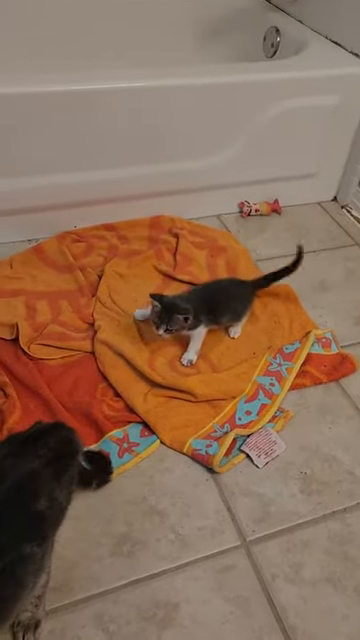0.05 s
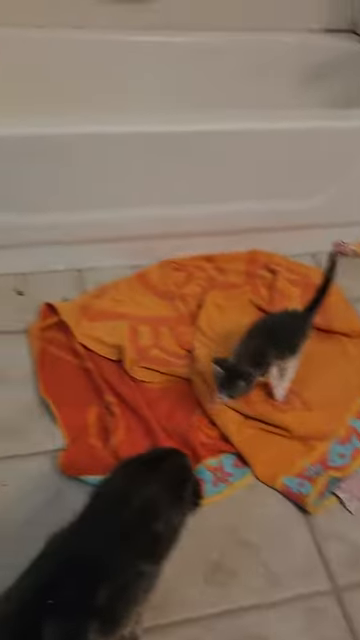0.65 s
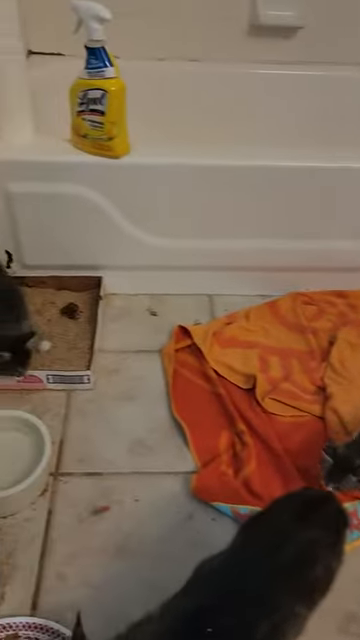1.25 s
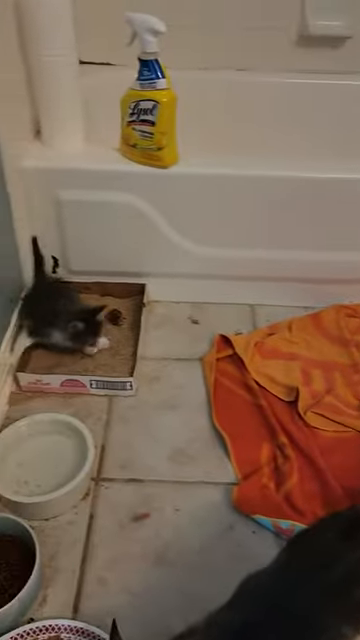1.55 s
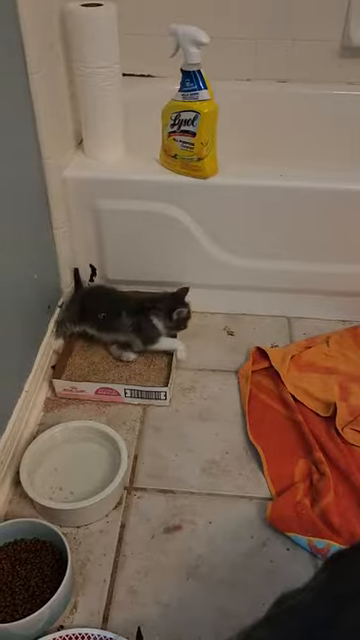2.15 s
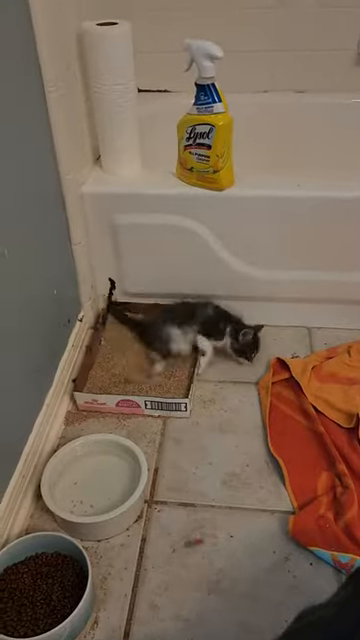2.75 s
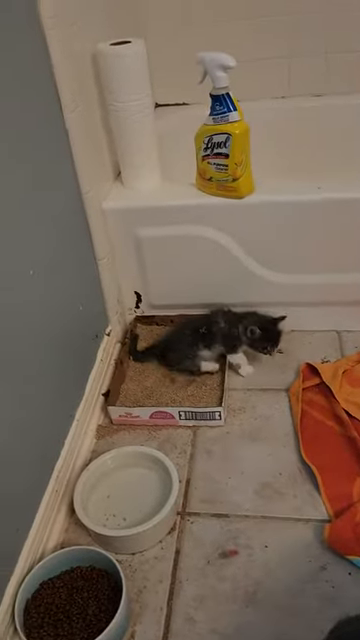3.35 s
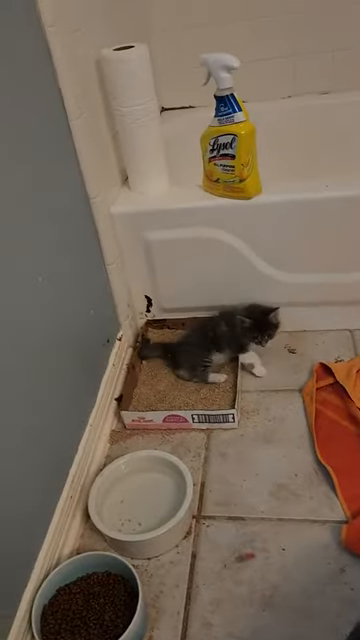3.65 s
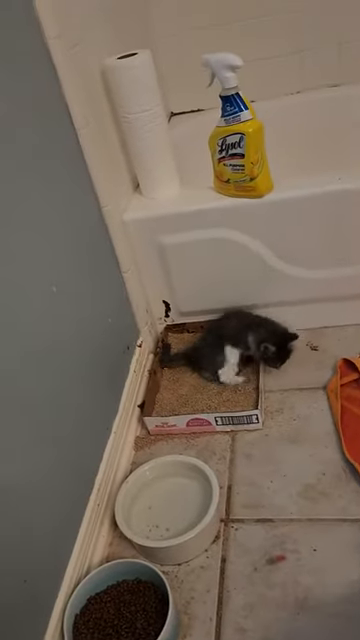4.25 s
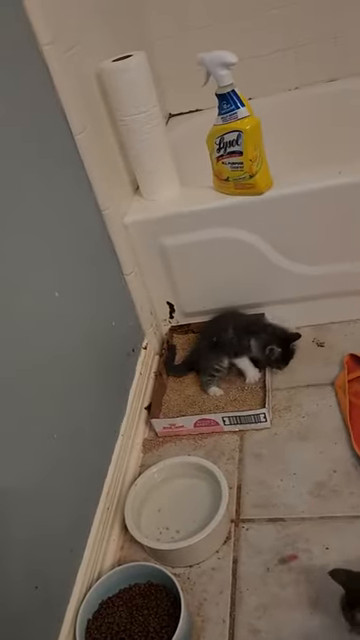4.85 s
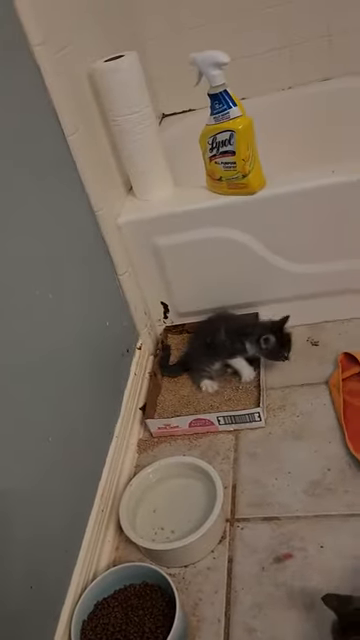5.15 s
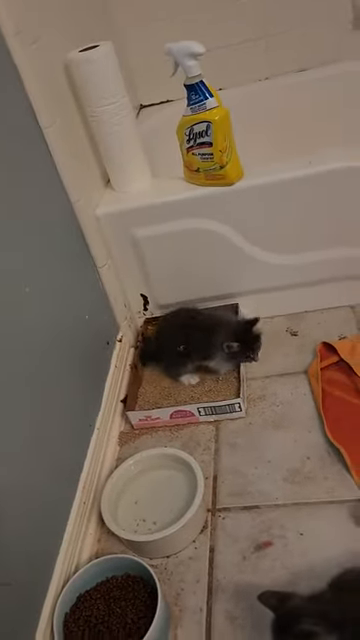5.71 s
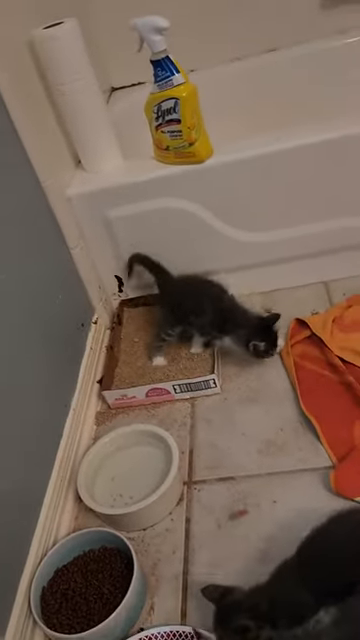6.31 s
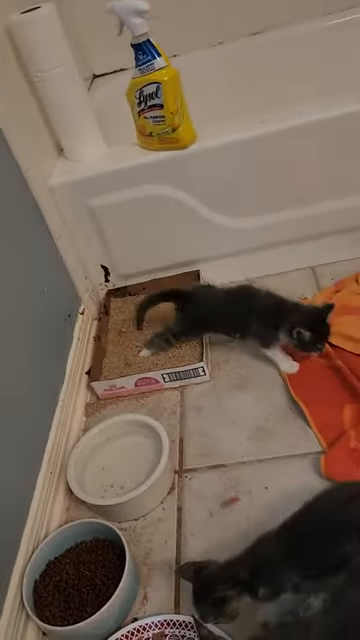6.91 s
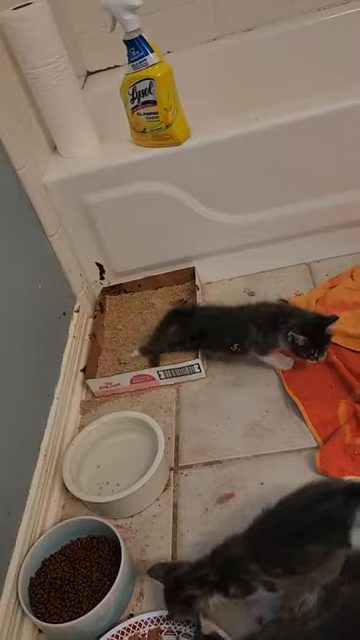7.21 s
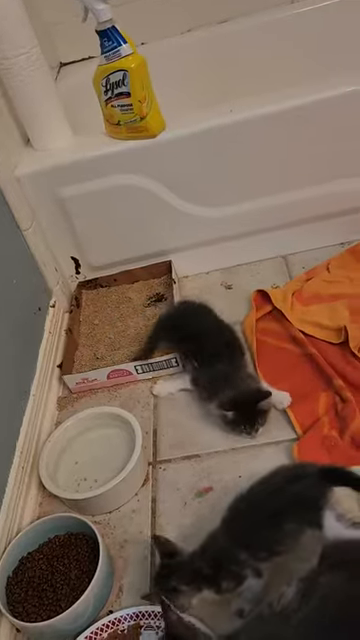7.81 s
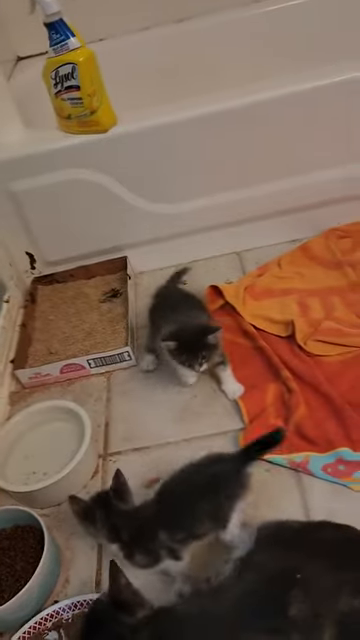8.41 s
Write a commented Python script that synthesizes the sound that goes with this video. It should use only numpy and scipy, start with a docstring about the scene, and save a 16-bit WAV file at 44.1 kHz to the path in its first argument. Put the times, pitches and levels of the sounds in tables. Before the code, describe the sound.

In a small tiled bathroom, kitten paws scrape cardboard, land softly and click on the floor before a brief, high, falling mew.

```python
"""Kittens play in a small tiled bathroom, over a faint bed of hum and hiss; the hard walls add a short,
bright ring. Paws scuff a corrugated cardboard tray in stick-slip strokes while claws and grit tick on
the tiles. Near 2 s a kitten lands with a thump, and soon the tray judders under a step on its rim.
At 5.5 s a hard pull tears at the dry fibres, followed by more scuffs and padded landings.
Around 8 s a kitten gives one thin, falling mew that brightens as its mouth opens."""
import sys
import numpy as np
from scipy import signal
from scipy.fft import rfft, irfft, next_fast_len
from scipy.io import wavfile

SR = 44100
rng = np.random.default_rng(int(sys.argv[2]) if len(sys.argv) > 2 else 0)


def digitize_waveform(pressure):
    """Quantize a signal to 16-bit integers and store it at the path in sys.argv[1].

    Rows of a 2-D input are taken as channels; values are limited to [-1, 1].
    """
    field = np.atleast_2d(pressure).T
    bounded = np.clip(field, -1, 1)
    quanta = np.round(bounded * 32767).astype(np.int16)
    wavfile.write(sys.argv[1], SR, quanta)


N = 377921
TIME = np.arange(N) / SR

# paws dragged over cardboard and cloth: peak t/s, level/dB, rise/s, fall/s, ring f/Hz, ring boost/dB
PAW_STROKES = [(.262, -46.5, 0.039, .11, 1250, 5.5), (.69, -65.5, .2, 0.48, 4000, 5.5),
               (1.348, -54, 0.0095, .011, 5330, 8), (1.508, -48.5, 0.024, 0.06, 1160, 14),
               (1.615, -57.5, .037, 0.018, 13000, 7), (1.845, -50.5, 0.017, 0.033, 870, 15.5),
               (1.93, -41.5, 0.025, 0.0091, 4200, 13.5), (1.965, -52, 0.038, 0.019, 5000, -6),
               (2.49, -57.5, 0.054, .13, 12500, 2.5), (2.70, -46, 0.061, 0.088, 3380, 7),
               (2.785, -40, 0.031, .071, 1940, 4), (2.91, -55, 0.04, 0.077, 1760, 6),
               (3.033, -47, 0.014, 0.013, 2310, 6.5), (3.508, -44, .044, 0.034, 2440, 3.5),
               (4.04, -65, 0.054, 0.045, 1250, 12), (4.281, -62, 0.037, 0.044, 12500, 3),
               (4.476, -50.5, 0.016, 0.028, 604, 9.5), (4.625, -54, 0.063, 0.042, 840, 8.5),
               (5.37, -62, .04, .026, 750, 18), (5.412, -50.5, .022, 0.031, 4000, 8),
               (5.5002, -26, 0.0037, 0.0035, 4300, 8.5), (5.509, -34.5, 0.0028, 0.0091, 2130, 9),
               (5.511, -30, .004, 0.013, 5500, 9), (5.915, -45.5, 0.057, 0.045, 3160, 10),
               (5.996, -42.5, .025, 0.031, 3250, 14), (6.135, -53.5, 0.028, 0.035, 3240, 9),
               (6.307, -52.5, 0.039, 0.075, 1430, 14.5), (6.358, -43, 0.0069, 0.039, 1250, 5),
               (6.53, -52, 0.052, .04, 4300, 6), (6.69, -54.5, 0.016, 0.065, 4040, -3),
               (6.855, -56.5, 0.064, 0.11, 1300, 6.5), (7.085, -62, 0.012, 0.15, 5500, 5),
               (7.497, -54.5, 0.017, 0.12, 3700, 7.5), (7.63, -56.5, 0.023, 0.068, 3600, 4.5),
               (7.86, -61, 0.085, .15, 6100, 12), (8.19, -64, 0.017, 0.14, 2000, -9)]
# tone colour of every scrape and tick: f/Hz, level/dB
FRICTION_EQ = [(120, -31), (250, -15), (400, -8), (650, -3), (1100, -1), (2200, 0.5), (3300, -2),
               (5500, -1.5), (7300, -1.5), (8500, -6), (12000, -7), (16000, -12.5)]
# claws and grit on tile, knocks on the tray: t/s, peak level/dB, ring f/Hz, ring boost/dB
CLAW_TAPS = [(0.5616, -39, 1050, 4), (.656, -32, 4900, 7), (1.0986, -44.5, 980, 19),
             (1.1894, -43.5, 4850, 6), (1.347, -47.5, 960, 26), (1.4302, -43, 2940, 14),
             (1.494, -41, 1420, 19), (1.799, -43, 784, 10), (1.84, -36, 1460, 23), (1.979, -33, 5040, 10),
             (2.1081, -32.5, 5330, 18), (2.3726, -24.5, 1480, 8), (2.38, -33.5, 930, 19),
             (2.5977, -38.5, 4640, 12), (3.304, -37, 2350, 5), (3.849, -46, 3100, 23),
             (4.341, -42.5, 3670, 5), (4.4682, -45, 3500, -3), (5.4565, -35, 4000, 22),
             (6.3567, -37, 3020, 30), (6.6707, -31.5, 4920, 10), (7.0747, -40, 4530, 3.5),
             (7.301, -44.5, 6500, 31), (7.491, -39.5, 3960, 1)]
# soft weight landing on tray and floor: t/s, level/dB, f/Hz
LANDINGS = [(.560, -45, 340), (1.10, -50, 360), (1.19, -55, 111), (1.811, -23, 131), (1.834, -27.5, 79.4),
            (2.374, -35, 643), (2.659, -42.5, 112), (2.75, -43, 113), (3.852, -54, 100),
            (4.228, -43.5, 126.4), (4.405, -44.5, 106), (4.713, -52, 131), (5.973, -31.5, 216),
            (5.985, -44, 101), (6.916, -40.5, 150), (6.967, -49, 107), (7.145, -45, 164), (7.495, -27, 207),
            (7.608, -26, 194), (7.624, -32.5, 308)]
# the tray judders as a kitten treads on its rim: t/s, level/dB
RIM_STEPS = [(2.728, -40), (2.752, -34.5), (2.825, -43), (5.973, -35.5)]
# tone colour of shaking cardboard: f/Hz, level/dB
FLUTTER_EQ = [(40, -32), (80, 0), (170, -2), (330, -1), (480, -11.5), (800, -17.5), (2000, -61),
              (6000, -70)]
# low resonances of tray, floor and tub: f/Hz, width/Hz, level/dB
LOW_MODES = [(74.5, 4.4, -12), (113.6, 5.7, -6), (202, 10.6, 2.5), (324, 8.3, 4.5), (366, 19, -4.5),
             (448.7, 30, 4.5)]
# pitch curve of the mew: t/s, f/Hz
MEW_GLIDE = [(7.97, 1720), (8.02, 1550), (8.06, 1325), (8.1, 1422), (8.145, 1433), (8.185, 1134),
             (8.255, 1140), (8.29, 1097), (8.37, 1133), (8.51, 1073)]
# effort behind the mew: t/s, level/dB
MEW_ENVELOPE = [(7.96, -85), (7.99, -55), (8.05, -59), (8.16, -53.5), (8.19, -46.5), (8.25, -46.5),
                (8.29, -53.5), (8.46, -60), (8.52, -71)]
# mouth opening, as overtones against the fundamental: t/s, level/dB
MEW_BRIGHTNESS = [(7.99, -4), (8.14, -2), (8.19, -18), (8.24, -11), (8.29, 1), (8.38, 13), (8.48, 7)]
# how the mouth weights the overtones: f/Hz, level/dB
MOUTH_EQ = [(2200, 2), (2800, -4), (3350, 1.5), (4200, -62), (5600, -37), (6700, -18), (7900, -20),
            (9000, -15.5), (10200, -17), (12000, -33)]
# ring of the bathroom: f/Hz, time to fall by 60 dB/s
REVERB_TIMES = [(100, 0.11), (300, 0.47), (1000, 0.48), (3000, 0.4), (7000, 0.43), (14000, 0.27)]
# stereo width of diffuse sound, side against mid: f/Hz, level/dB
SIDE_EQ = [(60, -13), (130, -12), (260, -9), (520, -3), (1100, 0.8), (5000, 0.75), (12000, 2)]
# tone colour of the room air: f/Hz, level/dB
AIR_EQ = [(20, -11), (42, -2), (70, 6), (105, 2.5), (190, 0), (270, -15), (420, -8), (650, -11),
          (1200, -12), (2700, -18), (4000, -16), (7300, -13.5), (9000, -25), (16000, -25)]
# narrow bands of background whirr: f/Hz, width/Hz, level/dB
WHIRR_BANDS = [(349, 56, -71.5), (1555, 225, -68.5), (1972, 84, -71)]
# resonances of the microphone port: f/Hz, width/Hz, boost/dB
PORT_EQ = [(9860, 2680, -8.5), (12100, 1100, 5)]


def scrapes(slips_per_s=88.5, snags_per_s=600, crackles_per_s=150, crisp_hz=12800, crisp_width_hz=3500):
    """Fur and pads stick and slip while claws snag on paper ridges; dry fibres sizzle and snap."""
    slip_db, spread_db, crackle_db, tear_from_db = 1.45, 3.5, -6, -44
    out = np.zeros(N)
    for s, level_db, rise, fall, hz, boost_db in PAW_STROKES:
        t = np.arange(-3 * rise, 3 * fall, 1 / SR)
        pressure = np.exp(-np.abs(t / np.where(t < 0, rise, fall)) ** 1.28)  # soft lead-in and tail
        slips = rng.standard_normal(int(len(t) / SR * slips_per_s) + 2)
        pressure *= from_db(slip_db * np.interp((t - t[0]) * slips_per_s, np.arange(len(slips)), slips))
        sizes = from_db(spread_db * np.minimum(rng.exponential(1, len(t)), 4))
        sizes *= rng.choice([-1, 1], len(t))
        snags = rms_one(sizes * (rng.random(len(t)) < snags_per_s / SR))
        snags = 9 * np.tanh(snags / 9)  # a ridge tears before the pull grows large
        crisp_db = -1 + 0.77 * max(level_db - tear_from_db, 0)  # tearing fibres sizzle much more
        force = bell_eq(rng.standard_normal(len(t)) + snags, crisp_hz, crisp_width_hz, crisp_db)
        snaps = sizes * (rng.random(len(t)) < crackles_per_s / SR)
        force += from_db(crackle_db) * rms_one(resonate(snaps, crisp_hz, crisp_width_hz))
        stroke = contact(force, hz, boost_db, relative_width=0.39)
        add(out, s + t[0], from_db(level_db) * pressure * stroke)
    return out


def contact(force, hz, boost_db, relative_width):
    """Friction colour plus the ring of the spot that is touched; unit power."""
    return rms_one(bell_eq(colour(force, FRICTION_EQ), hz, hz * relative_width, boost_db))


def ticks(grit_db=-56, grit_spread_db=6, grit_count=60):
    """Distinct claw taps and knocks, among faint random ticks of grit under the paws."""
    out = np.zeros(N)
    for s, peak_db, hz, boost_db in CLAW_TAPS:
        add(out, s, from_db(peak_db) * tick(hz, boost_db, fall_s=0.0014))
    for when, size, pitch in rng.random((grit_count, 3)):
        grain = tick(hz=2600 * 3 ** pitch, boost_db=20, fall_s=0.0029)
        add(out, when * TIME[-1], from_db(grit_db + grit_spread_db * size) * grain)
    return out


def tick(hz, boost_db, fall_s, bite_s=0.00054, crumble_db=17.0):
    """A click and a tiny burst of crumbling ring the spot briefly; peak 1."""
    t = np.arange(SR // 20) / SR
    force = rng.standard_normal(len(t)) * (1 - np.exp(-t / bite_s)) * np.exp(-t / fall_s)
    force *= from_db(crumble_db) / np.linalg.norm(force)
    force[round(bite_s * SR)] += 1  # the click
    softening = signal.butter(2, min(3.1 * hz, SR / 3), fs=SR, output="sos")  # low knocks are duller
    sound = contact(signal.sosfilt(softening, force), hz, boost_db, relative_width=0.31)
    return sound / np.abs(sound).max()


def thuds(flutter_db=-16.5, settle_s=0.017, settle_db=-13.5, floor_hz=116):
    """Paws land, the cardboard flutters and the body settles; a step on the rim shakes the tray."""
    out, t = np.zeros(N), np.arange(SR // 3) / SR
    for s, level_db, hz in LANDINGS:
        add(out, s, from_db(level_db) * (boom(t, hz) + from_db(flutter_db) * flutter(t)))
        add(out, s + settle_s, from_db(level_db + settle_db) * boom(t, floor_hz))
    for s, level_db in RIM_STEPS:
        add(out, s, from_db(level_db) * flutter(t))
    return out


def boom(t, hz, swell_cycles=0.67):
    """A padded blow swells into a few low cycles."""
    swell = t * hz / swell_cycles
    return swell * np.exp(1 - swell) * np.sin(2 * np.pi * hz * t)


def flutter(t, rise_s=0.0008, fall_s=0.038):
    """Loose cardboard shakes and comes to rest."""
    shake = rms_one(colour(rng.standard_normal(len(t)), FLUTTER_EQ))
    return shake * (1 - np.exp(-t / rise_s)) * np.exp(-t / fall_s)


def tray(x):
    """Landings ring the low resonances of tray, floor and tub, which give them body."""
    return x + sum(from_db(db) * resonate(x, hz, width) for hz, width, db in LOW_MODES)


def mew(tremble_hz=110, hoarse_above_hz=1200):
    """A thin voice, hoarse on its high opening notes; the overtones take over as the mouth opens."""
    hz = np.interp(TIME, *np.transpose(MEW_GLIDE))
    effort = from_db(np.interp(TIME, *np.transpose(MEW_ENVELOPE), left=-np.inf, right=-np.inf))
    bright = from_db(np.interp(TIME, *np.transpose(MEW_BRIGHTNESS)))
    jitter = np.where(hz > hoarse_above_hz, 0.027, 0.011)  # as a share of the pitch
    phase = 2 * np.pi * np.cumsum(hz * (1 + jitter * wander(tremble_hz))) / SR
    overtones = sum(from_db(at_hz(MOUTH_EQ, k * hz)) * np.sin(k * phase) for k in range(2, 10))
    return effort * (np.sin(phase) + bright * overtones) * np.sqrt(2 / (1 + bright ** 2))


def bathroom(predelay_s=0.001):
    """Dense echoes off tile and tub, dying octave by octave; unit energy in each channel."""
    t = np.arange(SR * 2 // 3) / SR
    rest, echoes = diffuse_noise(len(t)), 0
    for hz in 125 * 2 ** np.arange(8):
        crossover = signal.butter(2, min(hz * np.sqrt(2), SR / 2.1), fs=SR, output="sos")
        band = signal.sosfiltfilt(crossover, rest)
        rest = rest - band
        echoes = echoes + band * from_db(-60 * t / at_hz(REVERB_TIMES, hz))
    echoes = echoes * np.clip(t / predelay_s - 1, 0, 1)
    return echoes / np.sqrt(np.sum(echoes ** 2, axis=1, keepdims=True))


def place(x, spots, direct_db, room_db, pan_db, move_hz):
    """Pan a source with its reverb; as it moves, the echoes of several spots crossfade."""
    sends = np.array([wander(move_hz) for _ in spots])
    sends /= np.sqrt(np.sum(sends ** 2, axis=0))
    wet = sum(signal.oaconvolve((x * send)[None], echoes, axes=1)[:, :N]
              for send, echoes in zip(sends, spots))
    return (from_db(direct_db) * x + from_db(room_db) * wet) * from_db([[pan_db / 2], [-pan_db / 2]])


def room_tone(air_db=-63, hum_hz=61.5, hum_db=-68.5, waver_db=0.8):
    """A steady bed of air with the low hum of a motor and a few soft bands of whirr."""
    air = from_db(air_db) * rms_one(colour(diffuse_noise(N), AIR_EQ))
    hum_level = from_db(hum_db + waver_db * wander(rate_hz=8.4))
    hum = hum_level * np.sqrt(2) * np.sin(2 * np.pi * hum_hz * TIME)
    noise = diffuse_noise(N)
    whirr = sum(from_db(db) * rms_one(resonate(noise, hz, width)) for hz, width, db in WHIRR_BANDS)
    return air + hum + whirr


def diffuse_noise(size):
    """Stereo noise, narrow in the bass and wide in the treble."""
    mid, side = rng.standard_normal((2, size))
    side = colour(side, SIDE_EQ)
    return np.array([mid + side, mid - side])


def wander(rate_hz):
    """Smooth random modulation of unit power."""
    knots = rng.standard_normal(int(N / SR * 2 * rate_hz) + 4)
    return rms_one(np.interp(TIME * 2 * rate_hz, np.arange(len(knots)), knots))


def colour(x, spectrum):
    """Shape a sound with a smooth EQ curve."""
    size = next_fast_len(x.shape[-1] + SR // 20)
    gain = from_db(at_hz(spectrum, np.fft.rfftfreq(size, 1 / SR)))
    return irfft(rfft(x, size) * gain, size)[..., :x.shape[-1]]


def resonate(x, hz, width_hz):
    """One resonance with unit gain at its peak."""
    r = np.exp(-np.pi * width_hz / SR)
    feedback = [1, -2 * r * np.cos(2 * np.pi * hz / SR), r * r]
    return signal.lfilter(np.array([1, 0, -1]) * (1 - r * r) / 2, feedback, x)


def bell_eq(x, hz, width_hz, boost_db):
    """Lift or dip one band."""
    return x + (from_db(boost_db) - 1) * resonate(x, hz, width_hz)


def at_hz(points, hz):
    """Read a table on a log-frequency axis."""
    f, value = np.transpose(points)
    return np.interp(np.log(np.maximum(hz, 1)), np.log(f), value)


def from_db(db):
    """Decibels to gain."""
    return 10 ** (np.asarray(db) / 20)


def rms_one(x):
    """Scale to unit power."""
    return x / np.sqrt(np.mean(x ** 2) + 1e-20)


def add(track, s, sound):
    """Mix a sound in at its cue."""
    start = max(round(s * SR), 0)
    track[start:start + len(sound)] += sound[:N - start]


def scene():
    """Scrapes, ticks, thuds and the mew share one bathroom, over its room tone."""
    spots = [bathroom() for _ in range(4)]
    return (place(scrapes(), spots, direct_db=0.0, room_db=3.5, pan_db=-0.95, move_hz=151.04)
            + place(ticks(), spots, direct_db=-0.5, room_db=1.5, pan_db=-1.4, move_hz=3)
            + place(tray(thuds()), spots, direct_db=-4.5, room_db=-4.0, pan_db=-0.2, move_hz=3)
            + place(mew(), spots, direct_db=-5.0, room_db=-1.0, pan_db=-0.5, move_hz=3)
            + room_tone())


def record(dry):
    """The microphone port hollows and lifts the high treble; the top is cut steeply."""
    for hz, width, db in PORT_EQ:
        dry = bell_eq(dry, hz, width, db)
    cutoff_hz = 15750
    return signal.sosfilt(signal.ellip(12, .1, 80, cutoff_hz, fs=SR, output="sos"), dry)


dry = scene()
out = record(dry)
digitize_waveform(out)
```